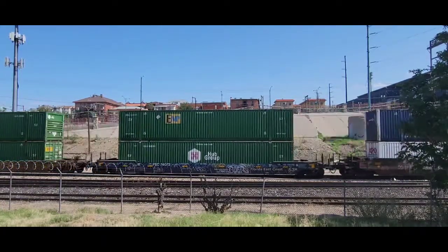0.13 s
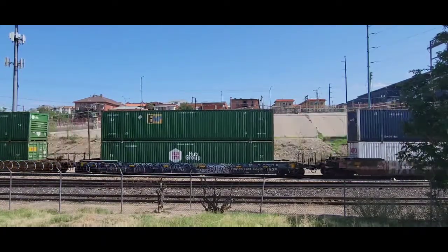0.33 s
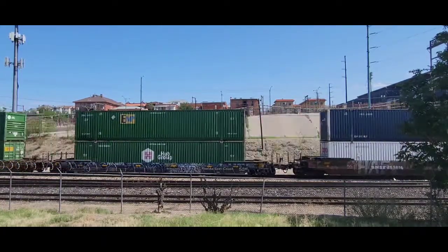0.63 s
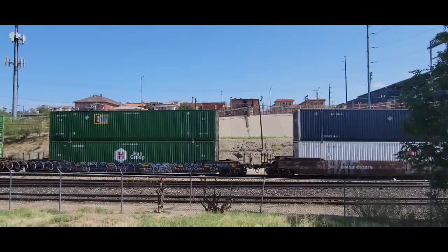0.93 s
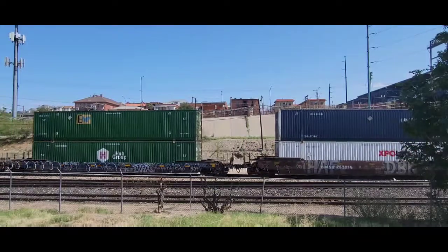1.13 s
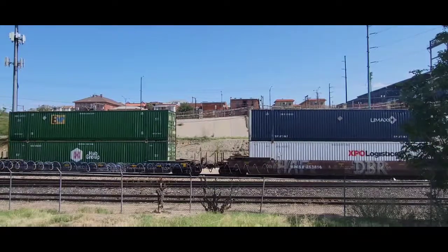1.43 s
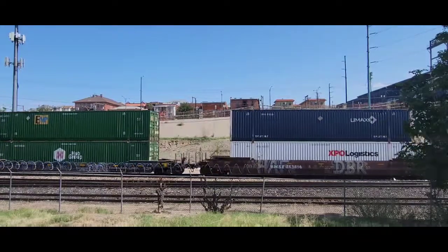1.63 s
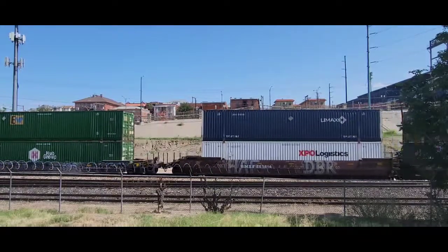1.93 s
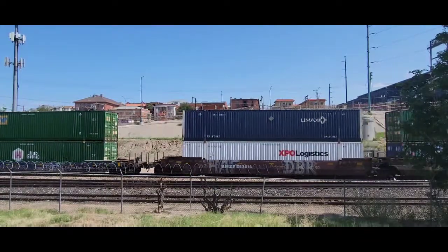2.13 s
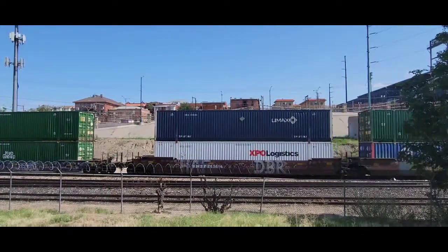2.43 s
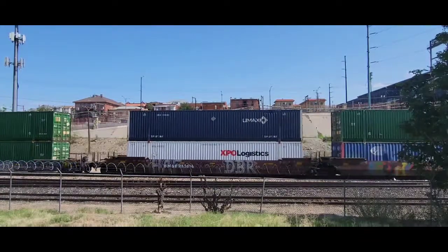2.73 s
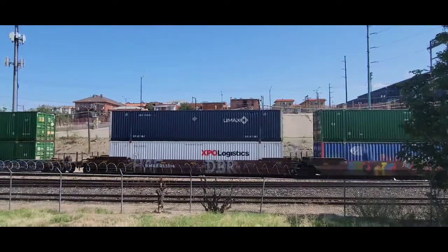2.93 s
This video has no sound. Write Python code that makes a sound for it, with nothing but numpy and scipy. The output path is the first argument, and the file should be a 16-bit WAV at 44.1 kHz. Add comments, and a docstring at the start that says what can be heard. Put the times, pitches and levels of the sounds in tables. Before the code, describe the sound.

A passing freight train makes a continuous deep rumble and rush of wheels, heard from a distance in the open air. Above it, steel wheels rub the rails with a bright hiss and overlapping high squeals that sink slightly in pitch.

```python
"""Freight train with a squealing wheelset

Outdoors, a stereo microphone some way off the track. The cars rumble and hum under the broad roll of
many wheels. One wheelset crosses from right to left: its flange rubs the rail, hisses, and rings the
wheel modes in bursts whose pitch sinks as it passes."""
import sys
import numpy as np
from scipy import signal
from scipy.fft import rfft, irfft, next_fast_len
from scipy.io import wavfile
from scipy.ndimage import uniform_filter1d, map_coordinates

SR = 44100
rng = np.random.default_rng(int(sys.argv[2]) if len(sys.argv) > 2 else 0)


def transcribe(u):
    """Save the signal u as a 16-bit wav file named by the first command-line argument.

    u: samples, shape (n,) or (channels, n), limited to [-1, 1]; the rate is SR.
    q: integer samples, one column per channel.
    """
    v = np.clip(np.atleast_2d(u).T, -1, 1)
    q = np.round(v * 32767).astype(np.int16)
    wavfile.write(sys.argv[1], SR, q)


N = 136710
T = np.arange(N) / SR


def amp(db):
    return 10 ** (np.asarray(db) / 20)


def unit_rms(x):
    return x / np.sqrt(np.mean(x ** 2) + 1e-20)


def at_hz(points, hz):
    """Interpolate (f/Hz, value) points on a log frequency axis."""
    freqs, values = np.transpose(points)
    return np.interp(np.log(hz + 1), np.log(freqs + 1), values)


def curves(rows):
    """One value per sample for each column after the time."""
    times, *columns = np.transpose(rows)
    return [np.interp(T, times, column) for column in columns]


def wobble(rate_hz, size=N):
    """A smooth random curve with rate_hz knots a second, 60 at most."""
    knots = rng.standard_normal(int(N * 60 / SR) + 4)
    return map_coordinates(knots, [np.arange(size) * min(rate_hz, 60) / SR])


def filtered(x, response):
    """Apply a gain given as a function of frequency."""
    size = next_fast_len(N + 8192)
    return irfft(rfft(x, size) * response(np.fft.rfftfreq(size, 1 / SR)), size)[..., :N]


def mode_noise(width_hz, size=N):
    """Complex noise of rms 1: the unsteady size and phase of a noise-driven mode."""
    pole = np.exp(-np.pi * width_hz / SR)
    real, imag = signal.lfilter([1], [1, -pole], rng.standard_normal((2, size)))
    return (unit_rms(real) + 1j * unit_rms(imag)) / np.sqrt(2)


def patchy_noise(depth_db, channels):
    """White noise whose gain varies in patches of time and frequency."""
    spectra = signal.stft(rng.standard_normal((channels, N)), nperseg=512)[2]
    patches = uniform_filter1d(rng.standard_normal(spectra.shape[1:]), size=4, axis=0)
    patches = uniform_filter1d(patches, size=14, axis=1)
    return signal.istft(spectra * amp(depth_db * unit_rms(patches)), nperseg=512)[1][:, :N]


def stereo_noise(colour, likeness, patchy_db):
    """Coloured noise with a given left-right likeness; its mid has rms 1."""
    def mid_side_gain(hz):
        angle = np.arccos(np.clip(at_hz(likeness, hz), -1, 1)) / 2
        return amp(at_hz(colour, hz)) * [np.cos(angle), np.sin(angle)]
    mid, side = filtered(patchy_noise(patchy_db, channels=2), mid_side_gain)
    return np.array([mid + side, mid - side]) / np.std(mid)


# Hum of the cars: t/s, level/dB
HUM_LEVELS = [(0, -21.5), (.22, -46), (.4, -29), (1.25, -26.5), (1.45, -36), (3.1, -33)]


def car_hum(pitch_hz=39.4):
    """A deep, slightly unsteady tone from the cars, a little right of centre."""
    phase = 2 * np.pi * np.cumsum(pitch_hz + 0.57 * wobble(4.57)) / SR
    level_db = curves(HUM_LEVELS)[0] + 1.2 * wobble(4.0)
    return amp(level_db + [[-.7], [.7]]) * np.sqrt(2) * np.sin(phase)


# Rumble of the cars: t/s, relative level/dB
RUMBLE_LEVELS = [(0, -26), (.15, -15), (.3, -27), (.6, -19.5), (1.1, -22), (1.45, -17), (1.55, -30.5),
                 (1.7, -19.5), (2.1, -19.5), (2.25, -20), (2.6, -20), (3.1, -18)]
# Its spectrum ahead of the low-pass: f/Hz, relative level/dB
RUMBLE_COLOUR = [(15, -41), (25, -14), (36, -10.5), (47, -4.5), (80, 1), (100, -2.5), (150, -16.5),
                 (250, -54), (400, -100)]


def car_rumble(evenness=0.27, cutoff_hz=160):
    """The cars' rumble, steadier than plain noise and nearly alike in both channels."""
    noise = stereo_noise(RUMBLE_COLOUR, likeness=[(30, 0.89), (100, 1.0)], patchy_db=-2.5)
    envelope = abs(signal.hilbert(noise.mean(axis=0)))
    evened = unit_rms(noise / (.15 + envelope) ** evenness)
    rumble = filtered(evened, lambda hz: 1 / (1 + (hz / cutoff_hz) ** 6))
    return amp(curves(RUMBLE_LEVELS)[0] + 0.5) * rumble


# Roll of the wheels: t/s, level/dB
ROLL_LEVELS = [(0, -29.5), (1, -31), (2.06, -31.5), (3.1, -27.5)]
# Its spectrum: f/Hz, relative level/dB
ROLL_COLOUR = [(76, -34), (130, -2.5), (323, -8), (706, -11.5), (972, -14.5), (1510, -15.5), (2030, -27),
               (2200, -55.5), (4840, -120)]
# Its stereo image: f/Hz, left-right correlation
ROLL_LIKENESS = [(130, 0.86), (250, 0.93), (400, -0.037), (700, -0.29), (1500, -0.6)]


def wheel_roll():
    """Many wheels rolling, heard from a distance as one broad rush."""
    level_db = curves(ROLL_LEVELS)[0] + 0.97 * wobble(6.7)
    return amp(level_db) * stereo_noise(ROLL_COLOUR, ROLL_LIKENESS, patchy_db=1.0)


# Rings of other wheels inside the hiss: f/Hz, level swing/dB
OTHER_WHEEL_DEPTH = [(1500, 0), (2200, 9), (6000, 9), (7500, 5)]


def other_wheels(noise):
    """Other wheels ring through the noise: thin resonances swell and fade at random pitches."""
    hz, _, spectra = signal.stft(noise, SR, nperseg=2048)
    swells = uniform_filter1d(rng.standard_normal(spectra.shape[1:]), size=10, axis=1)
    gain_db = at_hz(OTHER_WHEEL_DEPTH, hz)[:, None] * np.minimum(unit_rms(swells), 1.6)
    return signal.istft(spectra * amp(gain_db), nperseg=2048)[1][:, :N]


ABREAST_S, DRIFT_PER_S = 1.15, -.0075  # wheelset faces the microphone; relative change of its pitch


def left_lead(t, widest_s=0.0002684, crossing_s=1.85):
    """Seconds by which the left channel leads as the wheelset moves from right to left."""
    position = (t - ABREAST_S) / crossing_s
    return widest_s * position / np.sqrt(1 + position ** 2)


def passing_noise(diffuse, direct, likeness):
    """Mix each channel's own noise with a common one that arrives with the moving delay."""
    shift = left_lead(T) * SR / 2
    moved = [map_coordinates(direct, [np.arange(N) + side * shift], order=5, mode="mirror")
             for side in (1, -1)]
    return np.sqrt(likeness) * np.array(moved) + np.sqrt(1 - likeness) * diffuse


# Balance of a tone at the microphone: f/Hz, left over right/dB
MIC_BALANCE = [(1500, -2.5), (6000, 3.5), (8300, 13), (10500, 5.5), (12500, -14.5), (15000, -5)]


def passing_tone(hz, envelope, t):
    """A wheel tone with a complex envelope, reaching the two channels with the moving delay."""
    phase = 2 * np.pi * np.cumsum(hz) / SR
    shift = np.pi * hz * left_lead(t)
    pan_db = at_hz(MIC_BALANCE, hz.mean())
    tone = np.real(envelope * np.exp(1j * (phase + np.array([shift, -shift]))))
    return amp([[pan_db / 2], [-pan_db / 2]]) * np.sqrt(2) * tone


# Flange rubbing the rail: t/s, then level/dB of the middle, low and high hiss
RUB_LEVELS = [(0, -19.5, -24, -17.5), (.3, -22.5, -25.5, -19.5), (.65, -20.5, -27.5, -20),
              (1.05, -25, -28, -21.5), (1.35, -22.5, -25.5, -20), (1.57, -24, -32, -23.5),
              (1.8, -26.5, -31.5, -20), (1.95, -21, -28, -21), (2.18, -24.5, -26.5, -22),
              (2.45, -27, -28.5, -19.5), (2.62, -19, -29, -19.5), (2.8, -25, -27, -23),
              (3.1, -26, -27, -22)]
# Spectra of those three bands: f/Hz, relative level/dB
HISS_COLOURS = [
    [(5000, -31), (5400, -11.5), (7700, -5.5), (10200, -6.5), (11000, -12)],
    [(1350, -57), (1650, 6.5), (2000, 0), (3100, 6), (3600, -1.5), (4000, 5), (5300, 3), (5700, -51)],
    [(10000, -12), (10600, -2), (12000, 3.5), (13000, 3.5), (14800, 2.5), (15600, -15)]]


def flange_hiss(band_likeness=(0.045, 0.64, 0.16)):
    """The flange rubs the rail: three bands of hiss share one stick-slip unsteadiness."""
    grip_db = .5 * wobble(14) + .8 * wobble(28)
    hiss = 0
    for level_db, colour, likeness in zip(curves(RUB_LEVELS), HISS_COLOURS, band_likeness):
        noise = other_wheels(patchy_noise(depth_db=1, channels=3))
        band = filtered(noise, lambda hz: amp(at_hz(colour, hz)))
        gain = amp(level_db + grip_db + .7 * wobble(20))
        hiss += gain * unit_rms(passing_noise(band[:2], band[2], likeness))
    # only a trace of the tones' left-right imbalance
    return filtered(hiss, lambda hz: amp(0.092 * np.outer([1, -1], at_hz(MIC_BALANCE, hz)) / 2))


# Wheel modes: f/Hz abreast of the microphone, relative level/dB
WHEEL_MODES = [(1995, -43), (2487, -46), (2950, -41.5), (3190, -41), (3965, -36), (4608, -69),
               (4990, -37.5), (7280, -45), (8330, -40), (9410, -41), (11520, -46.5), (11780, -40.5),
               (12500, -35.5), (12870, -52), (13150, -37)]


def wheel_ring(width_hz=16, diffuse_gain=.6):
    """Rubbing keeps the wheel modes faintly ringing; they swell with the low or the high hiss."""
    _, low_db, high_db = curves(RUB_LEVELS)
    rings = 0
    for hz, db in WHEEL_MODES:
        rub_db = low_db if hz < 6500 else high_db
        gain = amp(db + rub_db - rub_db.mean() + 4.05 * wobble(9.06))
        direct = mode_noise(width_hz)
        diffuse = np.array([mode_noise(width_hz), mode_noise(width_hz)])
        pitch = hz * (1 + DRIFT_PER_S * (T - ABREAST_S))
        rings += passing_tone(pitch, gain * (direct + diffuse_gain * diffuse), T)
    return rings


# Long squeals: f/Hz at mid-squeal, relative pitch drift/(1/s)
LONG_SQUEALS = [(8370, -.003), (13205, -.0075), (12110, -.008), (9354, -.002), (3983, -.003)]
# One contour for each long squeal: t/s, level/dB
LONG_LEVELS = [
    [(0, -36), (.2, -27.5), (.33, -44), (.5, -34), (.8, -26), (.9, -16), (.99, -23.5), (1.15, -32),
     (1.25, -52), (1.4, -26), (1.65, -44)],
    [(0, -48), (.12, -23), (.25, -27), (.35, -47), (.6, -31), (1.22, -30)],
    [(.03, -24), (.4, -29), (.65, -25), (1.05, -32)],
    [(1.9, -17), (1.95, -26), (2.06, -22.5), (2.14, -52), (2.26, -22.5), (2.67, -29), (2.75, -31)],
    [(0, -31), (.2, -28), (.33, -32), (.55, -21.5)],
]
# Short squeals: start t/s, length/s, f/Hz at mid-squeal, level/dB
SHORT_SQUEALS = [(0.1, 0.2, 2010, -34), (0.1, 0.09, 1162, -35), (0.1, 0.23, 9491, -32),
                 (0.12, 0.22, 12549, -26), (0.27, 0.24, 12913, -24), (0.29, 0.2, 13915, -27),
                 (0.35, 0.15, 11572, -25), (0.43, 0.75, 8299, -32), (0.52, 0.17, 5064, -28),
                 (0.58, 0.13, 13943, -30), (0.72, 0.19, 13964, -31), (0.82, 0.48, 4612, -33),
                 (1.0, 0.12, 2950, -31), (1.0, 0.36, 9406, -33), (1.03, 0.45, 13871, -29),
                 (1.08, 0.41, 5308, -36), (1.17, 0.15, 2488, -33), (1.05, 0.22, 3966, -35),
                 (1.31, 0.09, 3963, -27), (1.28, 0.2, 1995, -33), (1.32, 0.3, 3187, -32),
                 (1.7, 0.31, 13895, -31), (1.85, 0.27, 8301, -37), (1.93, 0.19, 12581, -25),
                 (2.08, 0.41, 1993, -34), (2.25, 0.39, 4965, -35), (2.6, 0.3, 3905, -33),
                 (2.98, 0.12, 4555, -34)]


def wheel_squeals(edge_s=.04, waver_hz=6, flutter_db=2, rough_share=.14, rough_hz=60):
    """Each squeal is one wheel mode singing: a wavering, fluttering, partly rough tone that sinks."""
    squeals = [(contour[0][0], contour[-1][0] - contour[0][0], hz, curves(contour)[0], drift)
               for (hz, drift), contour in zip(LONG_SQUEALS, LONG_LEVELS)]
    squeals += [(start, length, hz, np.full(N, db), DRIFT_PER_S)
                for start, length, hz, db in SHORT_SQUEALS]
    out = np.zeros((2, N))
    for start, length, hz, level_db, drift in squeals:
        on = (T > start - edge_s) & (T < start + length + edge_s)
        age = T[on] - start
        ramp = np.clip(np.minimum(age, length - age) / (2 * edge_s) + .5, 0, 1)
        fade = np.sin(np.pi / 2 * ramp) ** 2
        pitch = hz * (1 + drift * (age - length / 2)) + waver_hz * wobble(29.1, len(age))
        grain = np.sqrt(1 - rough_share) + np.sqrt(rough_share) * mode_noise(rough_hz, len(age))
        gain = amp(level_db[on] + flutter_db * wobble(23.54, len(age)))
        out[:, on] += passing_tone(pitch, grain * fade * gain, T[on])
    return out


def scene():
    background = car_rumble() + wheel_roll() + car_hum()
    return background + flange_hiss() + wheel_ring() + wheel_squeals()


def record(dry, top_hz=15550):
    """The camera clips at full scale and keeps nothing above its band limit."""
    return filtered(np.clip(dry, -1, 1), lambda hz: hz < top_hz)


dry = scene()
out = record(dry)
transcribe(out)
```